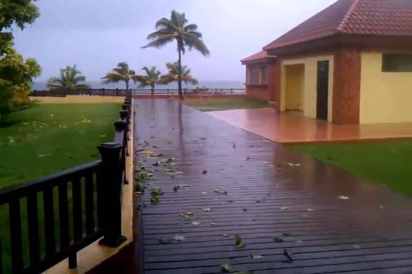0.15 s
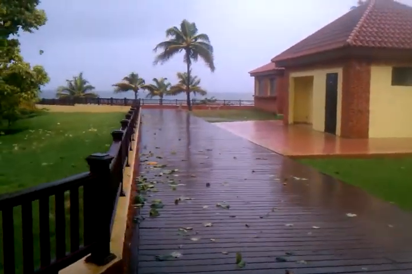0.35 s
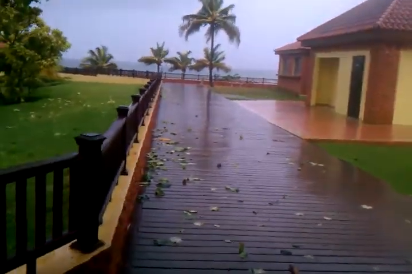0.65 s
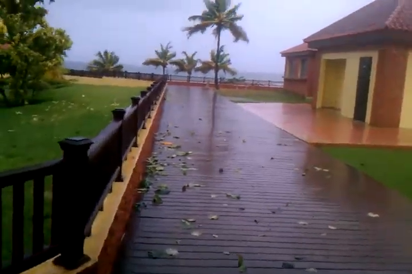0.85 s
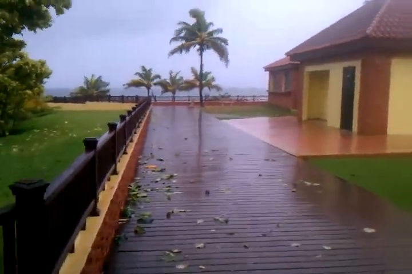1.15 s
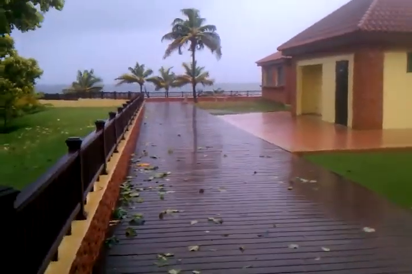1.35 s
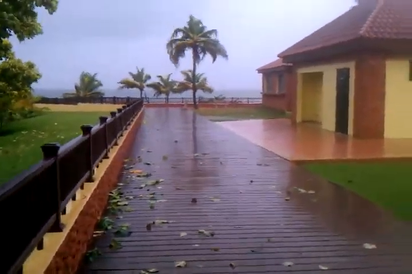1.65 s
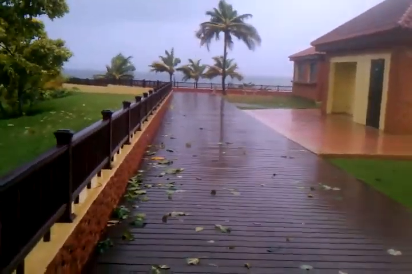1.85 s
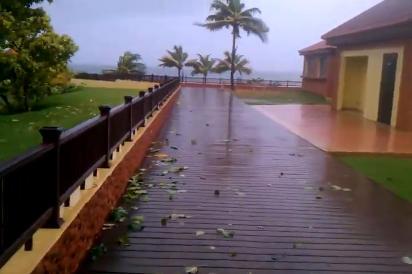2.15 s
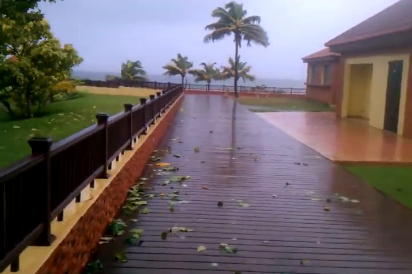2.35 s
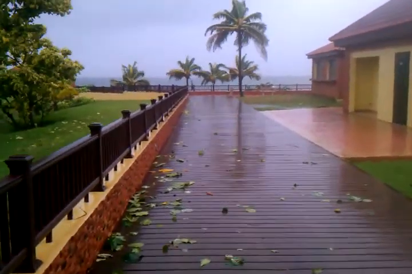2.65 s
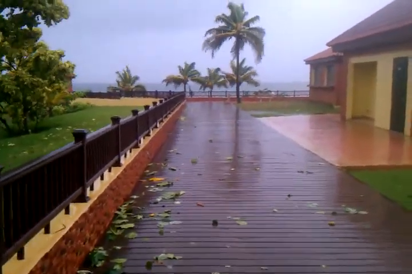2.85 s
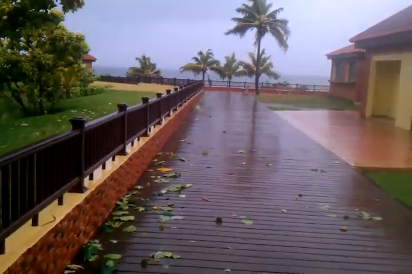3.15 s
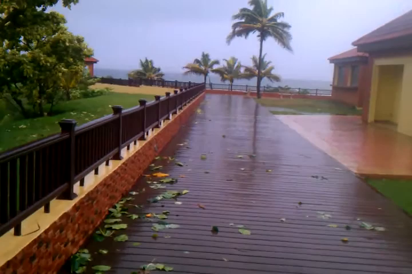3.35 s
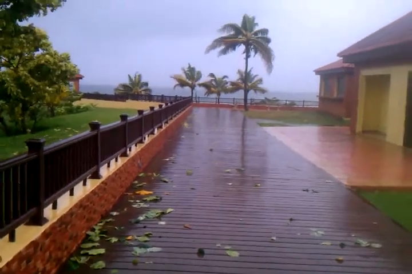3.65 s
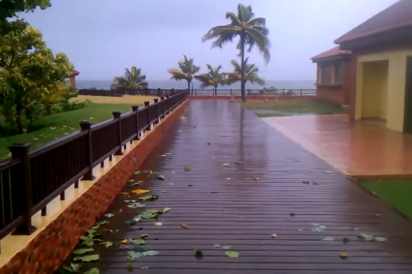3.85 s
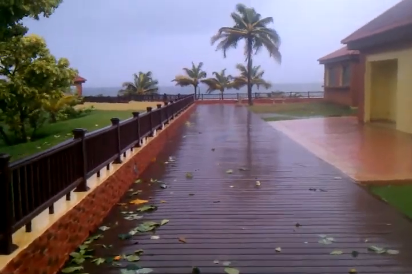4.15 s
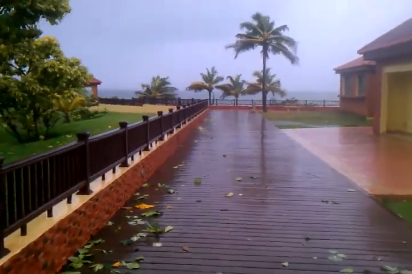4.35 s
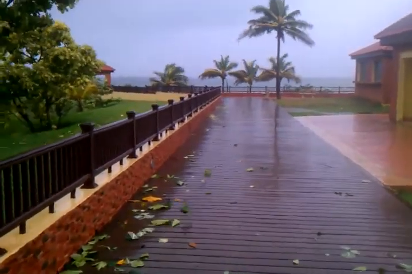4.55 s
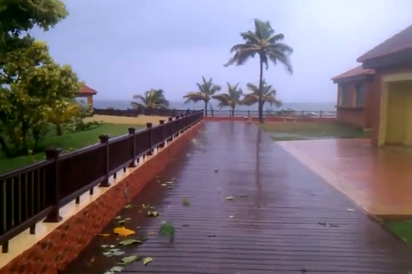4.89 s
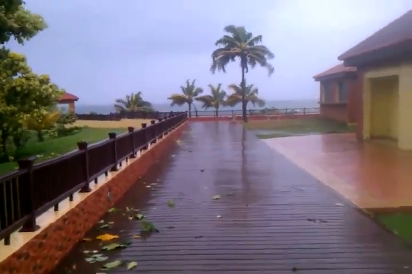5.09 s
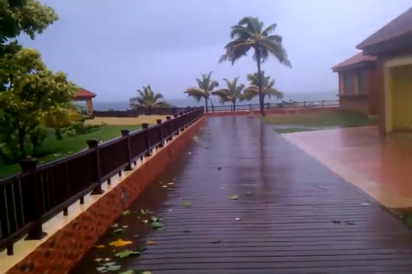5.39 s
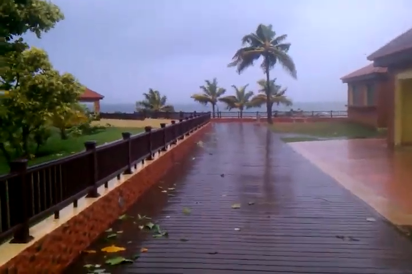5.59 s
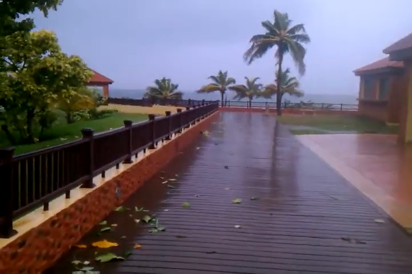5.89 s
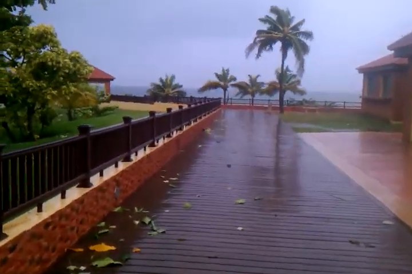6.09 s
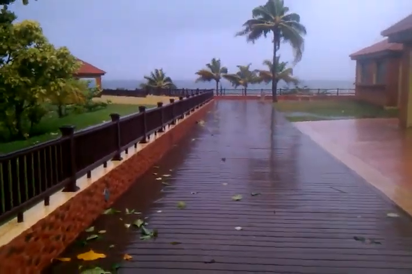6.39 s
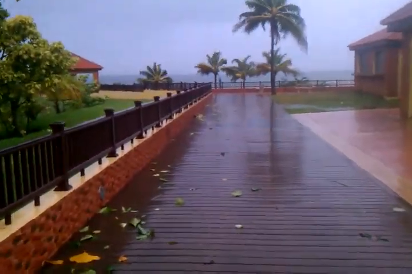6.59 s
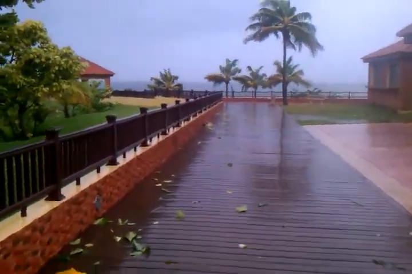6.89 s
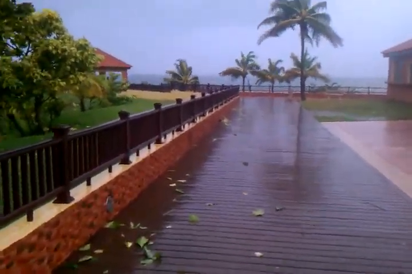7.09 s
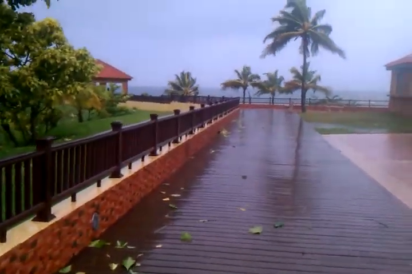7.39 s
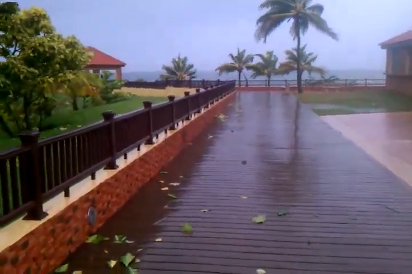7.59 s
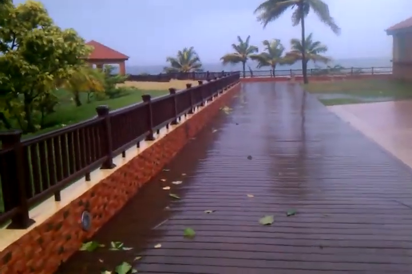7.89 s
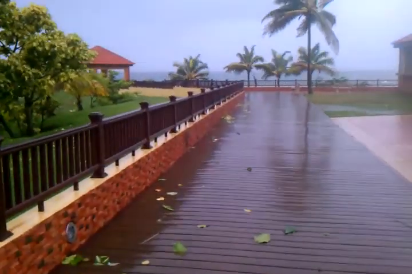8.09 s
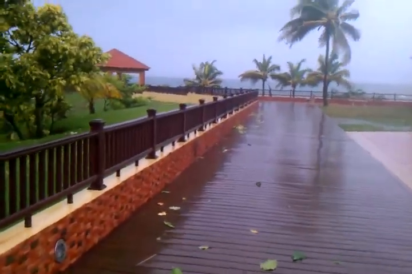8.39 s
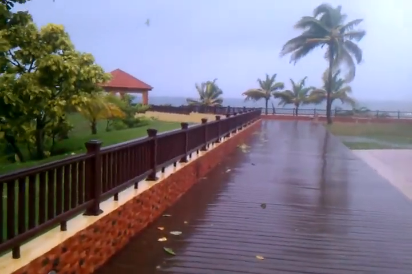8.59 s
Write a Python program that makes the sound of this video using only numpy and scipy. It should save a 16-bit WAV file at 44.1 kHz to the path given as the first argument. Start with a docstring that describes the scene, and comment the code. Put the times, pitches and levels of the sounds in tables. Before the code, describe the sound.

Heavy rain hisses steadily on a wet timber deck over a dull distant roar, until strong wind gusts thump the microphone near the end.

```python
"""Heavy rain on a wet timber deck by the sea in a storm, heard by one small microphone.
Rain and finer spray are dense random clicks, filtered into a hiss that flickers band by band.
Gusts buffet the microphone port: low filtered noise plus short pressure swings.
Wind and surf roar far off as dull noise. The whole sound drops by a step now and then and creeps back."""
import sys
import numpy as np
from scipy import signal
from scipy.fft import rfft, irfft
from scipy.io import wavfile
from scipy.ndimage import uniform_filter1d

SR = 44100
rng = np.random.default_rng(int(sys.argv[2]) if len(sys.argv) > 2 else 0)


def dump_mix(stems):
    """Bounce the given channels to the path in sys.argv[1] as a 16-bit WAV at rate SR."""
    frames = np.atleast_2d(stems).T  # one column per channel
    limited = np.clip(frames, -1, 1)  # hard clip at full scale
    pcm = np.round(limited * 32767).astype(np.int16)
    wavfile.write(sys.argv[1], SR, pcm)


N = 385434


def from_db(db):
    """Gain of a level in dB."""
    return 10 ** (np.asarray(db) / 20)


def rms_one(x):
    """Scale to rms 1."""
    return x / np.sqrt(np.mean(x ** 2) + 1e-20)


def in_time(rows):
    """Columns of a curve table, interpolated to every sample."""
    time_s, *columns = np.transpose(rows)
    return [np.interp(np.arange(N) / SR, time_s, column) for column in columns]


def shaped(x, spectrum):
    """Filter x by a response of (frequency [Hz], gain [dB]), interpolated over log frequency."""
    hz, db = np.transpose(spectrum)
    bins_hz = np.maximum(np.arange(N // 2 + 1) * SR / N, 1)
    gain_db = np.interp(np.log(bins_hz), np.log(hz), db)
    return irfft(rfft(x) * from_db(gain_db), N)


def coloured(x, spectrum):
    """Filter x by a spectrum, then scale to rms 1."""
    return rms_one(shaped(x, spectrum))


def drift(pole_hz):
    """Slow chance: noise through a double one-pole low-pass, scaled to rms 1."""
    step = 40   # samples per slow value
    pole = np.exp(-2 * np.pi * pole_hz * step / SR)
    noise = rng.standard_normal(N // step + 2002)
    slow = signal.lfilter([1], [1, -2 * pole, pole * pole], noise)[2000:]   # filter settled
    return np.interp(np.arange(N) / step, np.arange(len(slow)), rms_one(slow))


def patchy(x, edges_hz, patchy_db, pole_hz):
    """Split x into overlapping bands that sum to x; the level of each drifts by itself."""
    bins_hz, spectrum, out = np.arange(N // 2 + 1) * SR / N, rfft(x), np.zeros(N)
    for k in range(len(edges_hz)):
        share = np.interp(bins_hz, edges_hz, np.arange(len(edges_hz)) == k)
        band = irfft(spectrum * share, N)
        out += from_db(patchy_db * drift(pole_hz)) * band
    return out


def rain(deck_db, spray_db):
    """Rain on boards and ground, finer spray driven through leaves; sheets of rain pass over both."""
    # drop spectra: (frequency [Hz], relative level [dB])
    deck_spectrum = [(300, -18), (640, -12), (1000, -6), (1450, -3), (1750, 0.3), (2050, 0.5), (2350, -1),
                     (2800, -6), (3300, -8), (4500, -12.5), (7000, -27)]
    spray_spectrum = [(1500, -20), (2500, -5.5), (3300, -2), (4000, 0.5), (5000, -1.5), (6000, -4),
                      (7000, -6.5)]
    hiss = from_db(deck_db) * drops(deck_spectrum) + from_db(spray_db) * drops(spray_spectrum)
    sheets = from_db(0.48 * drift(8.7))
    return sheets * patchy(hiss, np.geomspace(400, 7000, 8), patchy_db=0.21, pole_hz=5.6)


def drops(spectrum):
    """Drops of uneven size land at random, so densely that they blur into a hiss."""
    drops_per_s = 14000
    size_db = np.minimum(rng.exponential(1, N), 5)
    clicks = from_db(size_db) * rng.choice([-1, 1], N)
    landed = rng.random(N) < drops_per_s / SR
    return coloured(clicks * landed, spectrum)


def buffeting():
    """Eddies over the port: low flutter that follows the gusts, with short pressure swings."""
    # flutter spectrum: (frequency [Hz], relative level [dB])
    flutter_spectrum = [(15, -10), (30, -6), (54, -4.5), (110, -9), (240, -16.5), (500, -25), (1000, -49)]
    # strongest single buffets: (time [s], peak level of the swing [dB], pitch [Hz])
    thumps = [(5.555, -31, 45), (5.63, -21.5, 65), (5.775, -28, 80), (7.035, -32, 35), (7.66, -22, 45),
              (7.88, -26, 60), (7.925, -22, 50), (7.988, -7.5, 52), (8.036, -10, 45), (8.091, -15, 60),
              (8.165, -13, 70), (8.327, -11, 105), (8.41, -15, 55), (8.444, -15, 75), (8.507, -17, 85),
              (8.555, -27, 55), (8.641, -15, 52)]
    ragged_db, ragged_band_hz = -13.5, [120, 350]   # rough air in each thump, rms re its peak

    eddies = coloured(rng.standard_normal(N), flutter_spectrum)
    power = uniform_filter1d(eddies ** 2, size=3000)
    eddies = eddies / (power + .05) ** 0.23   # evens out the flutter
    out = gustiness() * rms_one(eddies)

    band = signal.butter(2, ragged_band_hz, "band", fs=SR, output="sos")
    rough = from_db(ragged_db) * rms_one(signal.sosfilt(band, rng.standard_normal(N)))
    t = np.arange(N) / SR
    for time_s, peak_db, pitch_hz in thumps:
        cycles = (t - time_s) * pitch_hz
        envelope = np.exp(-.5 * (cycles / 0.46) ** 2)
        out += from_db(peak_db) * envelope * (np.cos(2 * np.pi * cycles) + rough)
    return out


def gustiness():
    """Strength of the wind on the port: a light breeze, and each gust swells and dies as one arch."""
    # gusts over the port: (start [s], length [s], top level [dB])
    gusts = [(0.6, 1, -50), (1.75, 0.37, -42), (2.55, 0.5, -49), (5.49, 0.3, -36), (6.1, 0.4, -47),
             (6.6, 0.57, -41), (7.15, 0.2, -42), (7.3, 0.49, -32.5), (7.74, 0.11, -35), (7.84, 0.46, -19),
             (8.296, 0.5, -24)]
    breeze_db = -54
    roundness = 0.57   # 0 = flat gust, higher = pointed
    lean = .8   # under 1 a gust rises faster than it dies
    t, out = np.arange(N) / SR, np.full(N, from_db(breeze_db))
    for start_s, length_s, top_db in gusts:
        done = np.clip((t - start_s) / length_s, 0, 1) ** lean
        arch = np.abs(np.sin(np.pi * done)) ** roundness * (done < 1)
        out += from_db(top_db) * arch
    return out


def roar(level_db):
    """Wind in the trees and surf beyond the deck: a dull smooth noise."""
    # roar spectrum: (frequency [Hz], relative level [dB])
    roar_spectrum = [(20, -20), (40, -18), (80, -5), (160, -4), (320, -0.5), (550, -3.5), (1000, -7),
                     (2000, -21)]
    noise = coloured(rng.standard_normal(N), roar_spectrum)
    return from_db(level_db) * patchy(noise, np.geomspace(30, 1000, 8), patchy_db=.5, pole_hz=2.8)


def level_dips():
    """Gain of the level drops: each is instant and fades exponentially; overlapping ones add in dB."""
    # sudden drops of the whole level: (time [s], depth [dB])
    steps = [(0.0, 3.3), (1.3854, 5), (2.277, 4), (2.9353, 4), (3.9836, 4.5), (4.988, 2.5), (6.2284, 4),
             (6.7457, 6.5), (7.0656, 4.5), (7.5186, 3), (7.935, 5.5), (8.0134, 6.5), (8.6488, 4)]
    recovery_s = .27   # time constant
    t, loss_db = np.arange(N) / SR, np.zeros(N)
    for time_s, depth_db in steps:
        loss_db += depth_db * (t >= time_s) * np.exp(-np.maximum(t - time_s, 0) / recovery_s)
    return from_db(-loss_db)


def scene():
    """Rain, buffeting and roar sum at one microphone, which feeds both channels."""
    # the storm: (time [s], rain on the deck [dB], spray [dB], far roar [dB])
    storm = [(0.0, -23, -22.5, -30), (0.6, -23, -23.3, -29.5), (1.3, -22.8, -22.7, -29),
             (2.0, -23, -22, -28.7), (2.6, -23, -22, -29.5), (3.2, -22.7, -20.3, -31),
             (3.6, -24.5, -21.5, -32.5), (4.0, -22.5, -21.2, -30.5), (4.7, -23, -22.5, -30.7),
             (5.16, -22, -23, -30), (5.6, -23.5, -23, -31.8), (6.5, -22.8, -22.6, -30.5),
             (7.15, -20.5, -21.5, -28.5), (7.55, -22.8, -23.5, -31), (7.95, -22, -24, -28.5),
             (8.34, -24.5, -25, -32.5), (8.74, -24.5, -24.5, -34)]
    offset = -0.015   # converter bias, ahead of the level dips
    deck_db, spray_db, roar_db = in_time(storm)
    air = rain(deck_db, spray_db) + buffeting() + roar(roar_db)
    return np.tile(level_dips() * (air + offset), (2, 1))


def record(dry):
    """A slow converter: treble ends at half its rate, a weak mirror image of it lies just above."""
    # filter before sampling: (frequency [Hz], gain [dB])
    anti_alias = [(6900, 0), (7200, -4.5), (7500, -9), (7700, -16), (7850, -30), (7950, -60), (8000, -78)]
    # what is left of the mirror image after sampling: (frequency [Hz], gain [dB])
    mirror_response = [(7900, -80), (8000, -3), (8300, -9), (8500, -16), (8750, -26), (9000, -38),
                       (9200, -53)]
    converter_hz, cutoff_hz = 16000, 9200

    band = shaped(dry, anti_alias)
    treble = signal.sosfilt(signal.butter(4, 6000, "high", fs=SR, output="sos"), band)
    carrier = np.cos(2 * np.pi * converter_hz * np.arange(N) / SR)
    mirror = shaped(2 * treble * carrier, mirror_response)
    low_pass = signal.ellip(10, .5, 60, cutoff_hz, fs=SR, output="sos")
    return signal.sosfilt(low_pass, band + mirror)


dry = scene()
out = record(dry)
dump_mix(out)
```